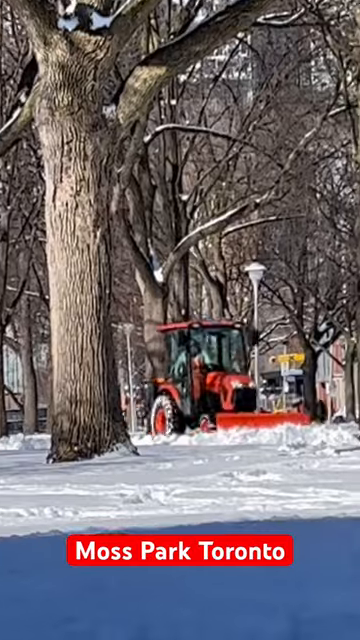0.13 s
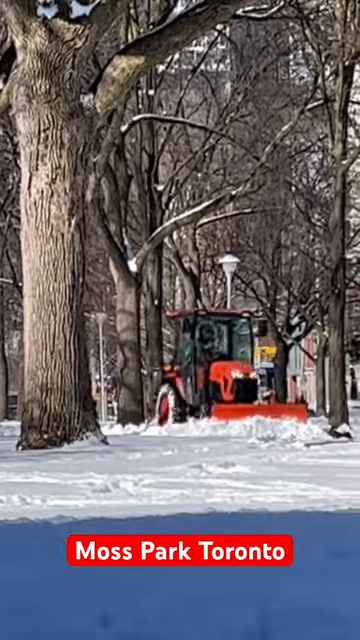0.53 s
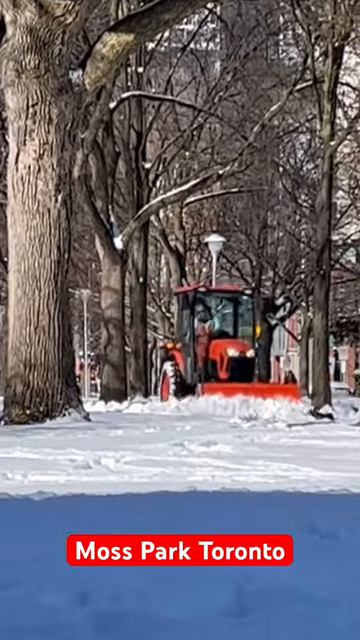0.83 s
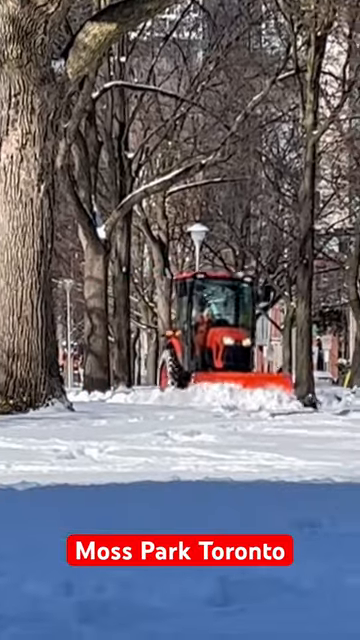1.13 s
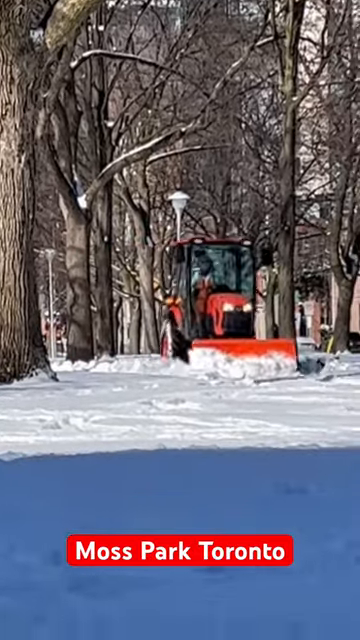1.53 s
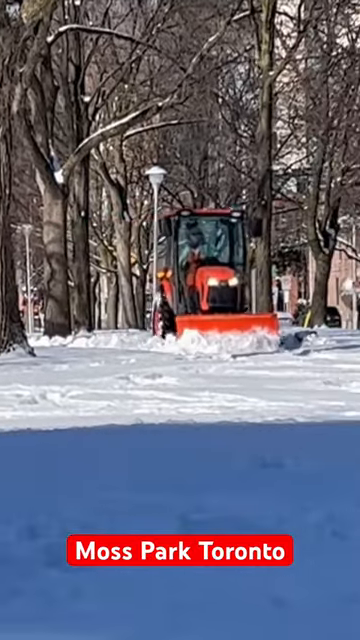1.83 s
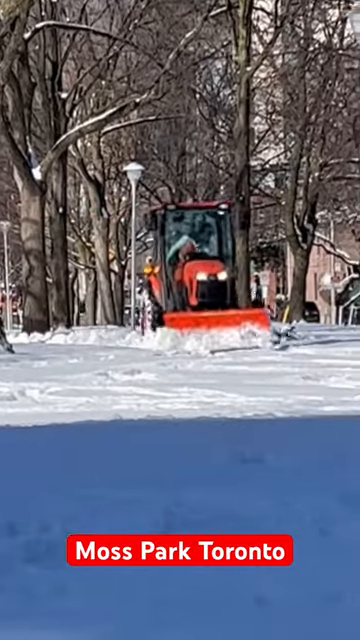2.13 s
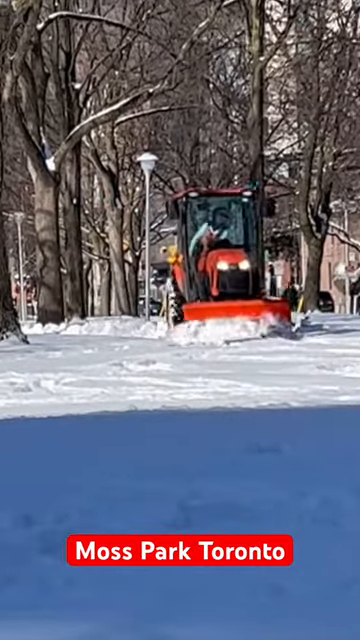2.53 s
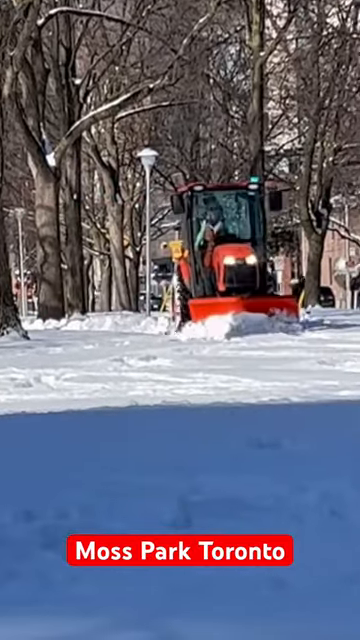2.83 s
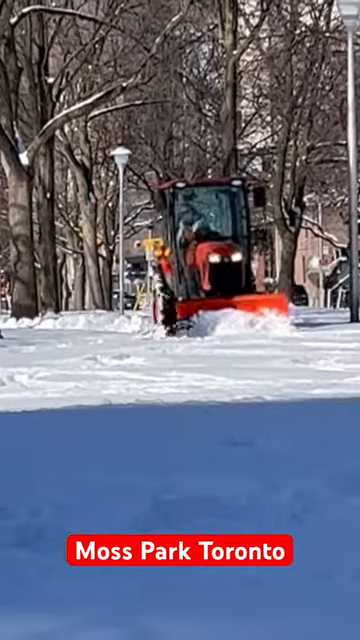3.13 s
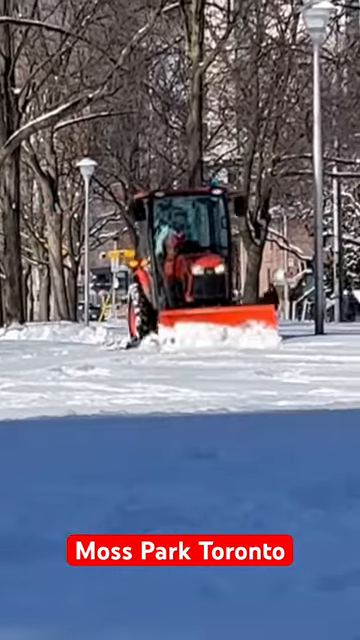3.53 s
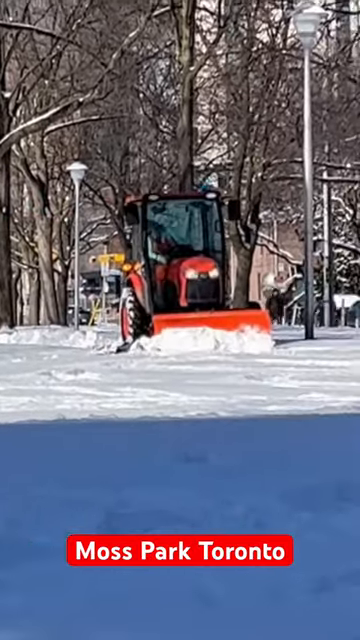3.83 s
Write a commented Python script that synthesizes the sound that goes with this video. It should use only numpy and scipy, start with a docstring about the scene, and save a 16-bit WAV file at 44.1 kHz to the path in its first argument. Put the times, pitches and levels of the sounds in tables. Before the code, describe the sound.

Wind on a phone microphone in an open snowy park: quiet low throbbing at first, then bassy thumps and fluttering gusts, strongest past the middle, easing at the end; a small plough tractor rumbles faintly far off.

```python
"""Wind on a microphone in an open snowy park

Gusts buffet a phone microphone: a low throb of wandering pitch, lumpy bands of turbulence and single eddy pulses.
Behind them lies the far roar of a small ploughing tractor and of wind in bare trees, as broad filtered noise
of unlike colour and phase in the two channels. A thin rumble stands for the engine; a faint hum glides up once.
"""
import sys
import numpy as np
from scipy import signal
from scipy.fft import rfft, irfft, next_fast_len
from scipy.io import wavfile
from scipy.ndimage import uniform_filter1d, map_coordinates

SR = 44100
rng = np.random.default_rng(int(sys.argv[2]) if len(sys.argv) > 2 else 0)


def wrap_up_sound(samples):
    """Save the sound to the file named by the first command line argument, as 16-bit audio."""
    columns = np.atleast_2d(samples).T
    # keep every value between -1 and 1, then stretch to whole-number steps
    tamed = np.clip(columns, -1, 1)
    steps = np.round(tamed * 32767).astype(np.int16)
    wavfile.write(sys.argv[1], SR, steps)


def amplitude_ratio(level_db):
    """Convert a level in decibels to the matching linear amplitude (field) ratio."""
    exponent = np.asarray(level_db, float) / 20
    return 10 ** exponent


N = 176400  # samples: 4 s


def unit(x):
    """Normalise the mean power: scale to rms 1."""
    return x / np.sqrt(np.mean(x ** 2) + 1e-20)


def along(points, hz, count=1):
    """Interpolate one column of a spectral table on a logarithmic frequency axis."""
    table = np.transpose(points)
    return np.interp(np.log(hz + 1), np.log(table[0] + 1), table[count])


def curves(rows):
    """Linear envelopes: one value per sample for each column after the time."""
    times, *columns = np.transpose(rows)
    return [np.interp(np.arange(N) / SR, times, column) for column in columns]


def wobble(rate):
    """Band-limited random modulation: a smooth curve through random knots, rate of them a second."""
    knots = rng.standard_normal(N // 200)
    return map_coordinates(knots, [np.arange(N) * rate / SR])


def filtered(x, response):
    """Linear filtering: multiply the spectrum of x by a complex response of frequency."""
    size = next_fast_len(N + 8192)
    spectrum = rfft(x, size)
    return irfft(spectrum * response(np.fft.rfftfreq(size, 1 / SR)), size)[..., :N]


def rush(spectrum, alike, lumps_db=0):
    """Partly coherent turbulence: mid and side noise, lumpy before colouring, sets the left-right correlation."""
    pair = rng.standard_normal((2, N)) * amplitude_ratio(lumps_db)

    def mid_side(hz):
        # the correlation is cos(2 * turn)
        turn = np.arccos(np.clip(along(alike, hz), -1, 1)) / 2
        return amplitude_ratio(along(spectrum, hz)) * [np.cos(turn), np.sin(turn)]

    mid, side = filtered(pair, mid_side)
    return unit(np.array([mid + side, mid - side]))


def throb():
    """Frequency modulation: a low tone of wandering pitch in narrow noise, swelling with the gusts."""
    # swells of the throb: t/s, level before trim/dB, centre of the wandering pitch f/Hz
    swells = [(0.0, -39, 62), (0.11, -43, 65.5), (0.2, -46.5, 59.4), (0.27, -41, 61.1), (0.36, -32.5, 67.7),
              (0.42, -47, 69), (0.44, -39, 70.3), (0.61, -39, 76.2), (0.65, -39.5, 76.2),
              (0.71, -37.5, 71.1), (0.95, -38.5, 73.3), (0.99, -36, 76.3), (1.1, -37, 64.25),
              (1.26, -32, 63.9), (1.39, -30, 80.2), (1.49, -26, 72.6), (1.68, -35.5, 74.95),
              (1.76, -38.5, 72.8), (1.84, -33, 71.94), (1.92, -30.5, 80.4), (2.06, -40, 69.56),
              (2.17, -36, 66.8), (2.25, -39.5, 73.6), (2.36, -30.5, 72.9), (2.38, -39, 74.3),
              (2.46, -41, 87.2), (2.53, -31, 87.8), (2.66, -27, 80), (2.74, -29, 80.8), (2.82, -27, 72.26),
              (2.99, -28.5, 71.6), (3.05, -33, 65.3), (3.35, -34.5, 65.1), (3.44, -35, 62.1),
              (3.64, -35.5, 65.1), (4.0, -41.5, 82.0)]
    # noise round the tone: f/Hz, relative level per Hz/dB
    noise_spectrum = [(12, -22), (28, -6), (45, 2), (72, -2.5), (100, -6.5), (150, -18), (300, -24),
                      (500, -120)]
    # coherence of that noise: f/Hz, left-right likeness (0-1)
    noise_alike = [(25, 1), (70, 0.95), (120, 0.46)]
    trim_db, noise_db = -0.9, -4  # noise_db is relative to the tone

    level_db, hz = curves(swells)
    log_drift = 0.0825 * (0.392 * wobble(11) + wobble(30))
    hz = hz * np.exp(log_drift)
    # a small opposite phase wander, in radians, parts left from right
    side_phase = 0.04 * wobble(17) * np.array([[1], [-1]])
    phase = 2 * np.pi * np.cumsum(hz) / SR + side_phase
    tone = unit(np.sin(phase) * amplitude_ratio(0.48 * wobble(12)))
    noise = amplitude_ratio(noise_db) * rush(noise_spectrum, noise_alike)
    return amplitude_ratio(level_db + trim_db) * (tone + noise)


def buffet():
    """Intermittent turbulence: eddies hit the ports in lumps, and the higher bands flare more sharply."""
    # deep buffeting: t/s, level before trim/dB
    deep_gusts = [(0.0, -48.5), (0.14, -45.5), (0.32, -51), (0.39, -43), (0.61, -48), (1.25, -41.5),
                  (1.29, -31.5), (1.32, -41), (1.38, -30.5), (1.41, -43), (1.51, -29.5), (1.59, -34.5),
                  (1.74, -38), (2.0, -31), (2.03, -41.5), (2.27, -33.5), (2.29, -43), (2.42, -32),
                  (2.44, -45), (2.51, -33.5), (2.61, -22), (2.63, -35), (2.66, -27.5), (2.76, -29),
                  (2.93, -26), (2.97, -35.5), (3.15, -31.5), (3.22, -44), (3.24, -36), (3.98, -37.5),
                  (4.0, -38)]
    # flutter above it: t/s, level before trim/dB, level of the upper band over the middle one/dB
    flutter = [(0.0, -55, 0), (0.25, -60, 3), (0.4, -53, -5), (0.7, -55.5, -2), (1.16, -49.5, -6),
               (1.48, -48.5, -3), (1.53, -38.5, -23), (1.57, -30, -13.5), (1.59, -43, -18),
               (1.63, -29.5, -10), (1.66, -42.5, -11), (1.68, -35.5, -13), (1.76, -43.5, -9.5),
               (1.82, -36, -10.5), (1.94, -45, -11), (1.96, -36, -13), (2.02, -37.5, -5), (2.05, -52, -4),
               (2.16, -40, -16), (2.28, -34.5, -5.5), (2.32, -53, -10), (2.34, -41.5, -18),
               (2.36, -42, 0.5), (2.43, -40.5, -7), (2.44, -50, -11), (2.48, -36.5, -13), (2.51, -46, -10),
               (2.53, -29.5, -11), (2.57, -32, -9.5), (2.64, -30.5, -7.5), (2.7, -24, -5),
               (2.74, -28.5, -4.5), (2.76, -28.5, -4), (2.81, -33.5, -8.5), (2.86, -36.5, 0.5),
               (2.91, -26.5, -1.5), (2.99, -40.5, -5), (3.0, -32.5, -5), (3.09, -44, -6), (3.15, -32, -15),
               (3.22, -41.5, -2), (3.24, -29, -8.5), (3.36, -40.5, -4), (3.4, -33, -5), (3.44, -41, -4),
               (3.5, -34.5, -5.5), (3.53, -42, -4.5), (3.58, -33, -12), (3.6, -49, 1), (3.62, -47, -2),
               (3.65, -36.5, -13), (3.69, -33, -9), (3.72, -50, -12), (3.77, -33, -14), (3.83, -50, -10),
               (3.87, -40, -19), (3.9, -49.5, -1), (3.95, -48, -10), (3.98, -40, -22), (4.0, -42, -8)]
    # spectra of the four bands: f/Hz, relative level per Hz/dB
    lower_spectrum = [(30, -15), (70, -10.5), (110, -1), (170, -3.5), (230, -10), (350, -23.5), (600, -120)]
    middle_spectrum = [(90, -25), (180, -4), (250, 0.5), (350, -2), (470, -6), (680, -29), (1200, -120)]
    upper_spectrum = [(200, -43), (380, -5.5), (500, -0.5), (650, -4), (850, -13.5), (1100, -23.5),
                      (1500, -40), (2500, -120)]
    spray_spectrum = [(400, -44), (650, -10), (820, -1), (1000, -10), (1200, -16), (1600, -48),
                      (2500, -120)]
    # coherence at the ports: f/Hz, left-right likeness (0-1)
    wind_alike = [(25, 1), (70, 1), (150, 0.88), (400, 0.94), (800, 0.36)]
    lower_trim_db, flutter_trim_db = -0.06, -0.84
    # the spray has spray_base_db where the upper band stands at spray_from_db; growth is in dB per dB
    spray_base_db, spray_from_db, spray_growth = -38.5, -29.5, 1.84

    (level_db,) = curves(deep_gusts)
    flutter_db, upper_db = curves(flutter)
    eddies = wobble(40)  # lumps shared by all bands
    lower = rush(lower_spectrum, wind_alike, lumps_db=1.07 * eddies)
    middle = rush(middle_spectrum, wind_alike, lumps_db=1.94 * eddies + 0.68 * wobble(70))
    upper = rush(upper_spectrum, wind_alike, lumps_db=2.0 * eddies + 0.5 * wobble(90))
    spray = rush(spray_spectrum, wind_alike, lumps_db=1.8 * eddies + 3.0 * wobble(110))
    # the top edge rises faster than the flutter under it
    spray_db = spray_base_db + spray_growth * (flutter_db + upper_db - spray_from_db)
    deep = amplitude_ratio(level_db + lower_trim_db) * lower
    fluttering = amplitude_ratio(flutter_db + flutter_trim_db) * (middle + amplitude_ratio(upper_db) * upper)
    return deep + fluttering + amplitude_ratio(spray_db) * spray


def pops():
    """Pressure pulses: each eddy pushes for a cycle or two under a bell, in random phase, slightly off centre."""
    # single eddies: start t/s, bell height before trim and pan/dB, pitch f/Hz
    eddies = [(0.434, -25, 83.4), (0.639, -29, 72.4), (1.163, -24, 72.56), (1.259, -20.5, 73),
              (1.284, -21, 72.7), (1.36, -18, 75.4), (1.409, -29, 81.15), (1.458, -19, 74.9),
              (1.52, -23, 240), (1.531, -16.5, 130), (1.559, -23, 219.3), (1.613, -21, 281),
              (1.679, -26, 249.5), (1.822, -23, 330.7), (1.959, -23, 209), (2.007, -25, 480),
              (2.136, -28, 239), (2.211, -19, 214), (2.261, -20.5, 264.6), (2.359, -32, 531),
              (2.524, -21, 207), (2.578, -14, 204), (2.654, -20, 199.5), (2.669, -16.5, 160.6),
              (2.693, -16, 482), (2.716, -15, 330.7), (2.752, -19.5, 705), (2.776, -16, 298.5),
              (2.828, -20, 503), (2.864, -19, 598), (2.889, -21, 419.4), (2.909, -20, 215.6),
              (3.004, -19, 287.4), (3.127, -24, 227.3), (3.198, -21, 399), (3.239, -22.5, 247.4),
              (3.266, -26, 299.2), (3.399, -29, 201), (3.485, -18.5, 414), (3.565, -21.5, 204),
              (3.682, -20.5, 282), (3.752, -25, 390), (3.862, -26, 272)]
    bell_cycles = 0.63  # half width of the bell at 1/e
    trim_db, pan_db = -1, 1.16  # pan_db is the random spread, opposite in the two ports

    out = np.zeros((2, N + 2048))
    t = np.arange(2048) / SR
    chances = rng.standard_normal((len(eddies), 2))
    for (start, db, hz), (turn, pan) in zip(eddies, chances):
        u = t * hz / bell_cycles - 1.5
        push = np.exp(-u ** 2) * np.cos(2 * np.pi * hz * t + 3 * turn)
        gain = amplitude_ratio(db + trim_db + pan_db * pan * np.array([[1], [-1]]))
        out[:, round(start * SR):][:, :len(t)] += gain * push
    return out[:, :N]


def roar():
    """Partial coherence: far broadband noise with faint patches, its gain and phase unlike in the two channels."""
    # swells: t/s, level before trim/dB, then middle, upper middle and treble levels/dB, used about their means
    swells = [(0.0, -57, 11, -3.5, -15), (0.07, -53.5, 6.9, -1, -16), (0.29, -53, 5.7, -0.5, -16.5),
              (0.81, -52, 6.8, 0, -10.5), (1.1, -49, 5.6, 0, -11.5), (1.2, -46.5, 4.8, 0.5, -12.5),
              (1.31, -47, 4.4, -3.5, -15), (1.41, -51, 8.6, -2.5, -9), (1.68, -47, 1.9, 0, -13),
              (1.78, -50.5, 6.6, 1, -10.5), (2.06, -50, 6.5, -0.5, -11.5), (2.28, -53, 9.7, -2, -11.5),
              (2.41, -48, 4.1, -1.5, -14.5), (2.97, -51.5, 5.6, 2.5, -8.5), (3.12, -47, 7.5, -0.5, -11),
              (3.22, -51, 11.6, -2.5, -12.5), (3.36, -53.5, 9.7, -1.5, -11.5), (3.53, -48.5, 2, -2.5, -14),
              (3.78, -56.5, 9, -3.5, -16.5), (4.0, -57.5, 5.5, -7.5, -16)]
    # colour of the left channel: f/Hz, relative level per Hz/dB
    far_spectrum = [(60, -22), (150, -2), (400, -5), (1000, 0), (2000, 0), (3200, -2.5), (5000, -7.5),
                    (8000, -14.5), (11000, -18.5), (15000, -25), (17000, -120)]
    # right channel against left: f/Hz, gain/dB, phase/rad, likeness (0-1)
    right_against_left = [(100, 6.5, 0.5, 1), (476, -0.5, 0, 0), (820, 2.5, -2, 0.26),
                          (1130, 4.5, -3, 0.53), (1385, 11.5, -3, 0.86), (1578, 13, -3.0, 0.92),
                          (1725, 12, -0.5, 0.89), (1866, 10.5, 1.04, 1), (2110, 5, -0.3, 0.78),
                          (2400, 1, -0.8, 0.93), (2580, 0.7, -0.4, 0.98), (3060, 1, 0.53, 0.91),
                          (3550, 0, 0, .998), (4050, 0, 0, .999), (4250, 0, 0, 1), (5180, 0, 0, 1),
                          (5320, -1, 0.3, .93), (5770, -0.5, 0.83, 0.68), (6980, -0.5, 1.1, 0.73),
                          (8090, 0, 3, 1), (10200, 0.5, 5, 0.89), (11000, -0.5, 5.5, 1),
                          (13000, -1.5, 5, .995), (13800, 1.5, 8, .6), (15000, 0, 11, .9)]
    trim_db = 7.5
    middle_hz, bright_hz, treble_hz = 2190, 3600, 8000  # band edges

    level_db, *over_db = curves(swells)
    middle_db, bright_db, treble_db = [v - v.mean() for v in over_db]

    # patches: random gains smoothed over 12 bins and 12 frames
    z = signal.stft(rng.standard_normal((2, N)), nperseg=512)[2]
    field = rng.standard_normal(z.shape[1:])
    field = uniform_filter1d(uniform_filter1d(field, 12, 0), 12, 1)
    pair = signal.istft(z * amplitude_ratio(0.7 * unit(field)), nperseg=512)[1][:, :N]
    pair = pair * amplitude_ratio(0.5 * wobble(5.78) + 0.21 * wobble(29.925))
    pair = unit(filtered(pair, lambda hz: amplitude_ratio(along(far_spectrum, hz)) * (hz > 40)))

    # bands that sum to the whole, each with its own swell
    low = filtered(pair, lambda hz: 1 / (1 + (hz / middle_hz) ** 4))
    high = filtered(pair, lambda hz: 1 - 1 / (1 + (hz / bright_hz) ** 6))
    top = filtered(pair, lambda hz: 1 - 1 / (1 + (hz / treble_hz) ** 4))
    between = pair - low - high
    bands = low * amplitude_ratio(middle_db) + between + (high - top) * amplitude_ratio(bright_db) + top * amplitude_ratio(treble_db)
    left, other = amplitude_ratio(level_db + trim_db) * bands

    def right_response(hz):
        alike = np.clip(along(right_against_left, hz, count=3), 0, 1)
        phase = along(right_against_left, hz, count=2)
        gain = amplitude_ratio(along(right_against_left, hz)) * np.exp(1j * phase)
        return gain * [alike, np.sqrt(1 - alike ** 2)]

    right = filtered(np.array([left, other]), right_response).sum(0)
    return np.array([left, right])


def engine():
    """Low-frequency noise radiation: the far tractor as a thin, almost steady rumble."""
    # rumble: f/Hz, relative level per Hz/dB
    rumble_spectrum = [(15, -20), (30, -6), (70, 0), (150, -12), (230, -22), (600, -22), (1000, -25),
                       (1400, -40), (2500, -120)]
    # coherence: f/Hz, left-right likeness (0-1)
    rumble_alike = [(60, 1), (200, 0.32), (500, 0.089), (1000, 0.046)]
    level_db = -43 + 0.9 * wobble(2.2)
    return amplitude_ratio(level_db) * rush(rumble_spectrum, rumble_alike)


def hum():
    """Random frequency modulation: a faint low tone, blurred, glides up with the first gust."""
    # glide: t/s, level before wobble/dB, pitch before blur f/Hz
    glide = [(0.7, -70, 185.4), (0.9, -55, 199.9), (1.03, -46.5, 215.2), (1.15, -44, 245), (1.22, -50, 247),
             (1.3, -75, 250.2)]
    level_db, hz = curves(glide)
    level_db = level_db + 5.1 * wobble(24.8)
    hz = hz * np.exp(0.12 * wobble(35))
    return amplitude_ratio(level_db) * np.sin(2 * np.pi * np.cumsum(hz) / SR)


def scene():
    """Superposition: wind on the microphone over the far roar, engine and hum."""
    return throb() + buffet() + pops() + roar() + engine() + hum()


def roll_off(x):
    """The treble ends steeply here."""
    return signal.sosfilt(signal.butter(12, 14390, fs=SR, output="sos"), x)


def record(dry):
    """The signal chain after superposition, applied to the finished mix."""
    return roll_off(dry)


dry = scene()
out = record(dry)
wrap_up_sound(out)
```